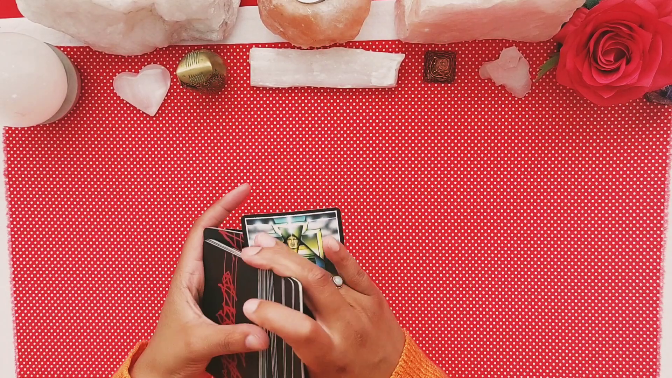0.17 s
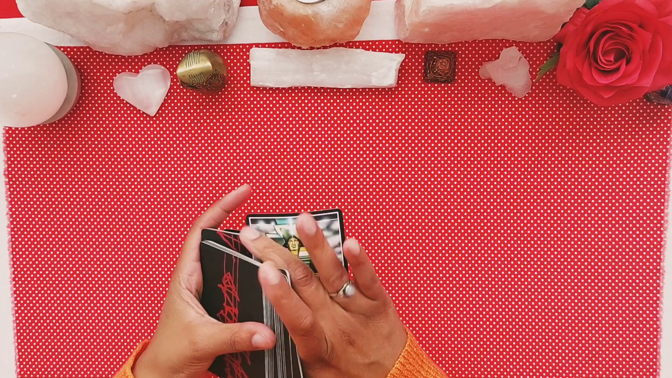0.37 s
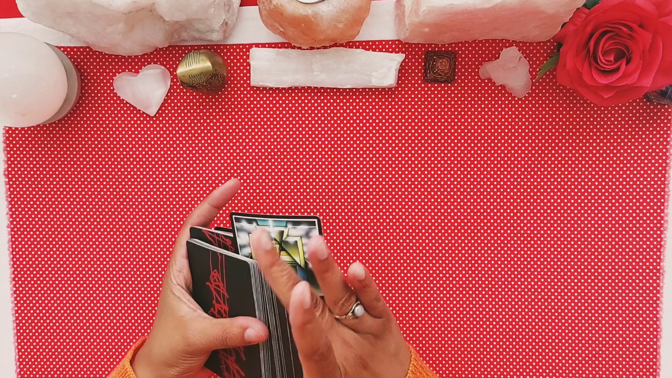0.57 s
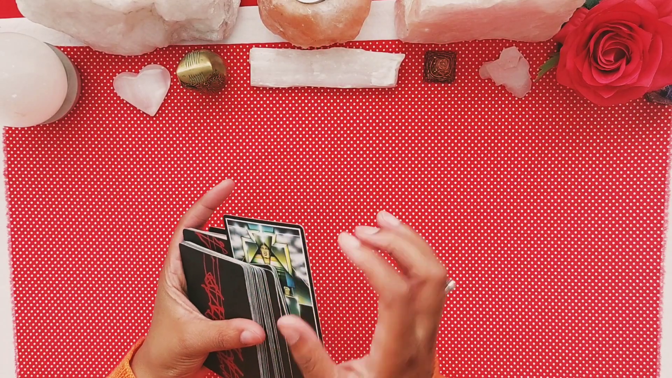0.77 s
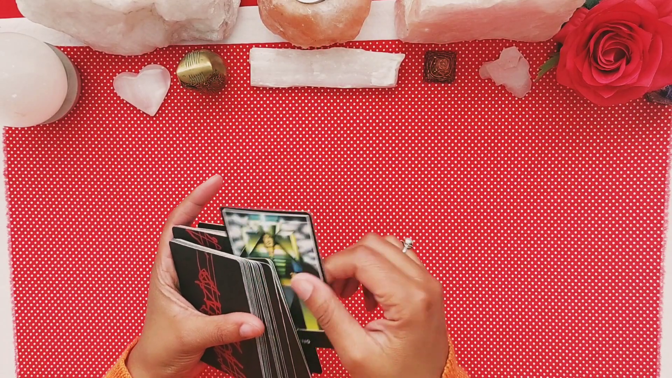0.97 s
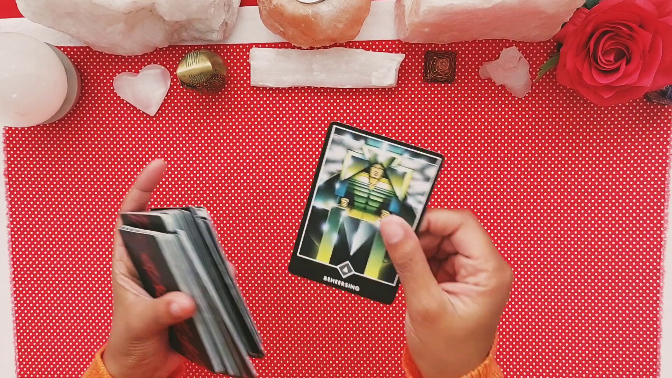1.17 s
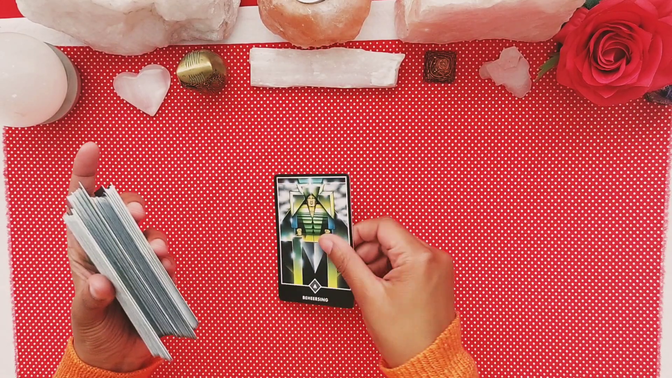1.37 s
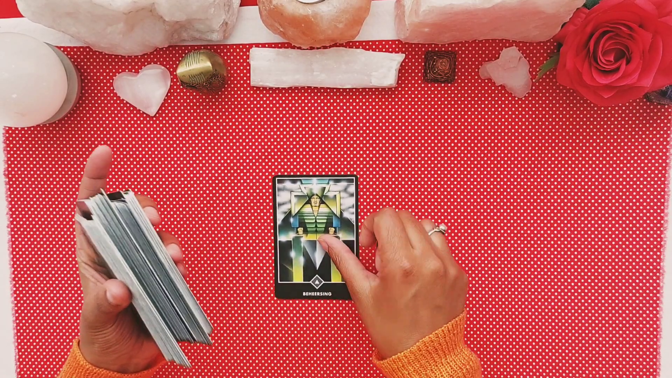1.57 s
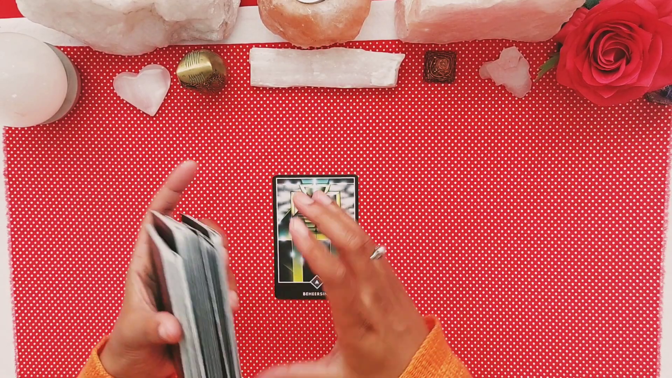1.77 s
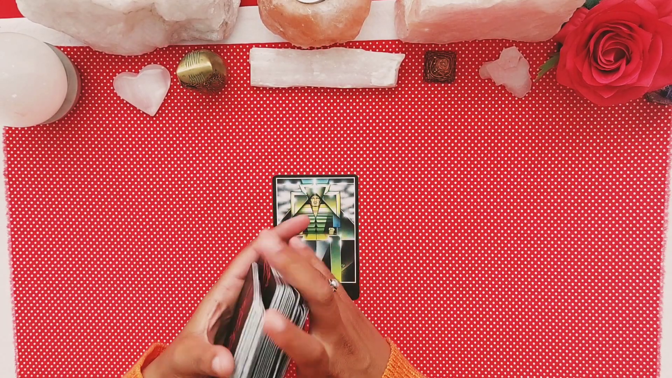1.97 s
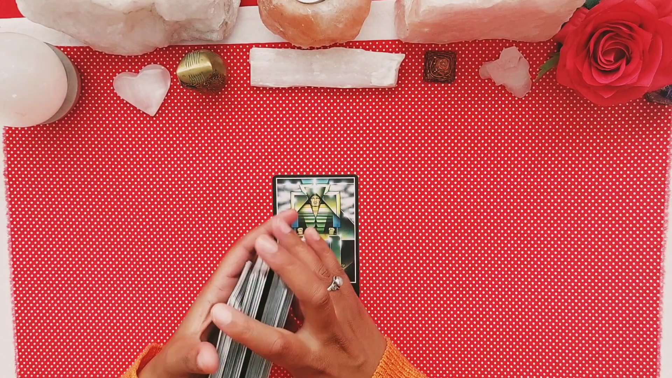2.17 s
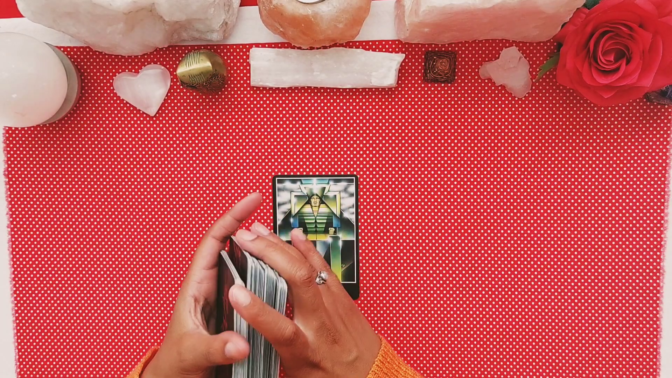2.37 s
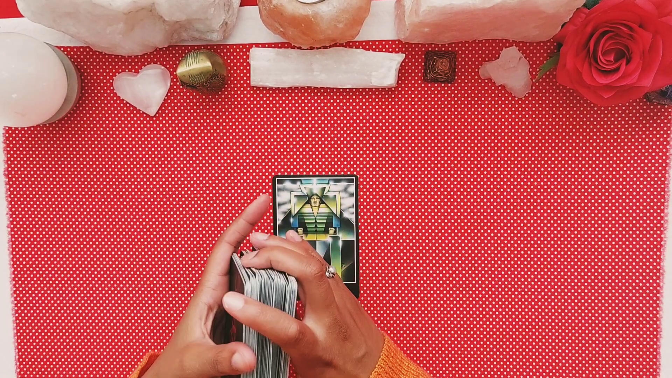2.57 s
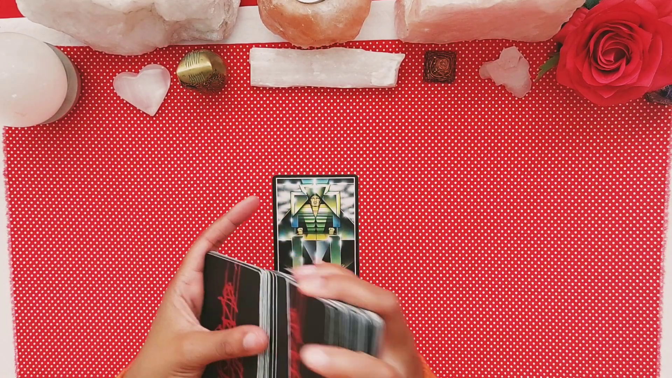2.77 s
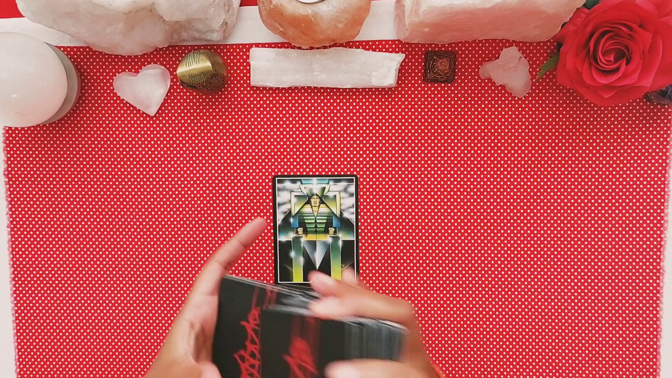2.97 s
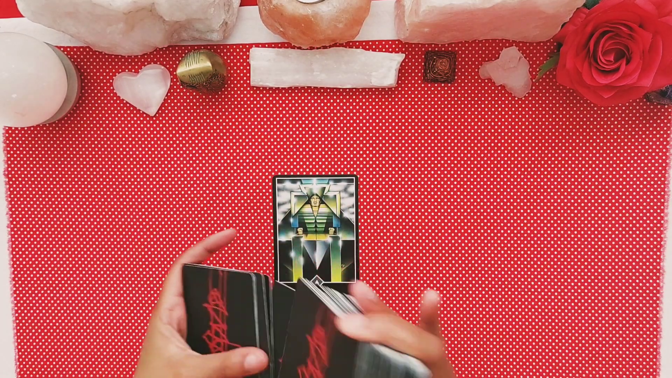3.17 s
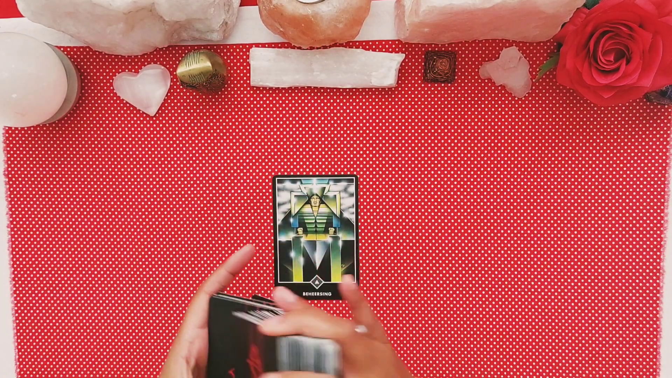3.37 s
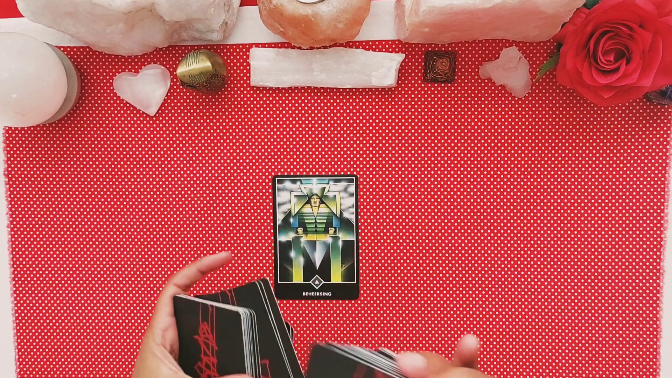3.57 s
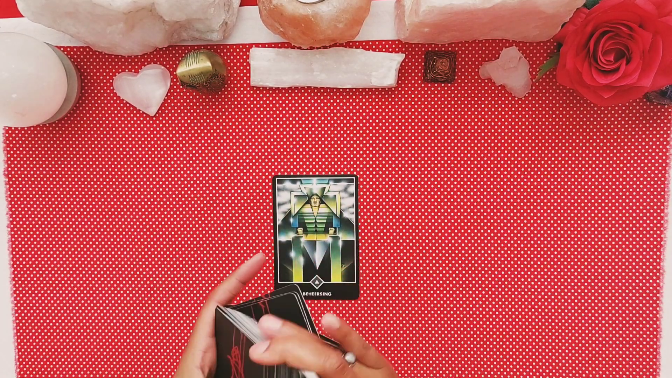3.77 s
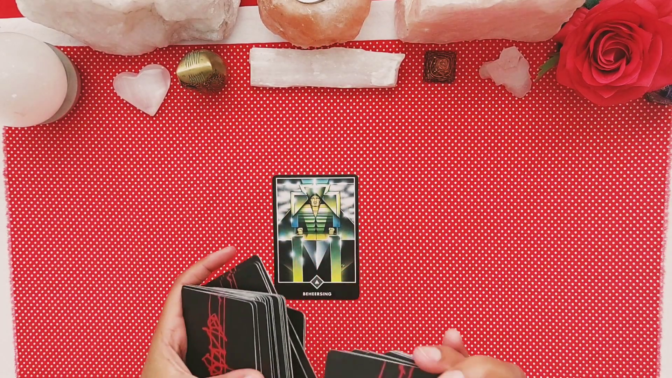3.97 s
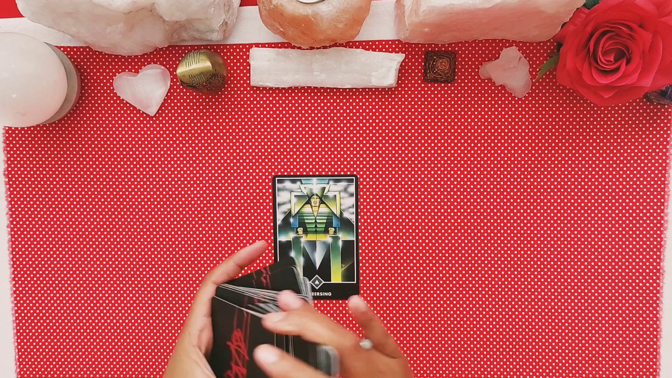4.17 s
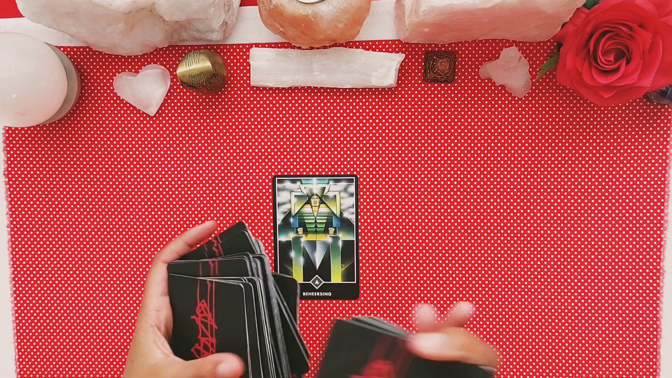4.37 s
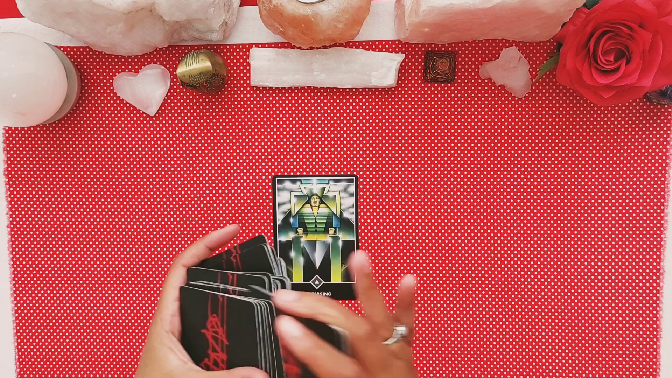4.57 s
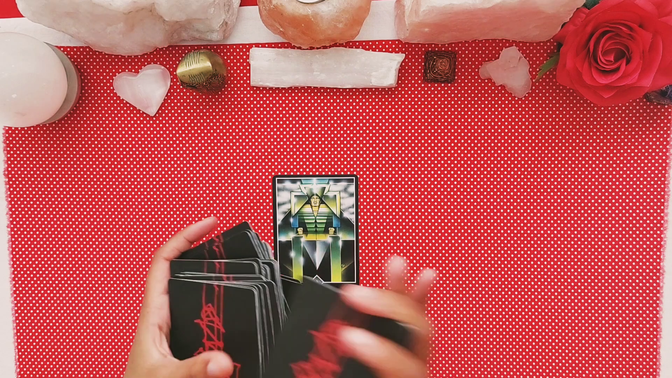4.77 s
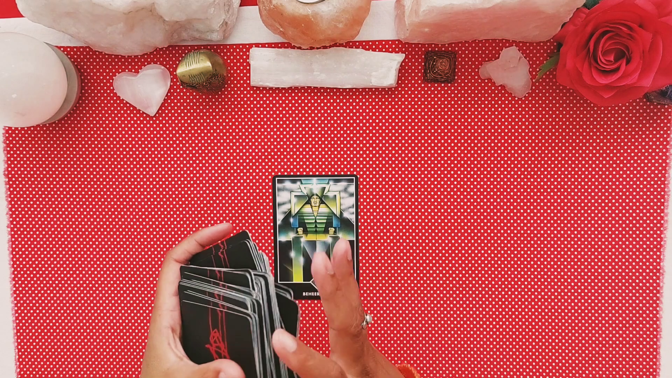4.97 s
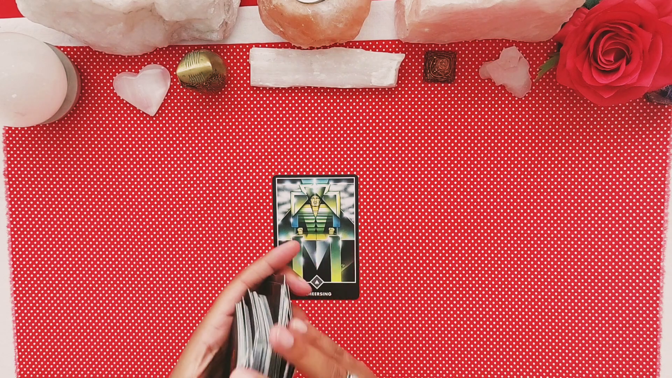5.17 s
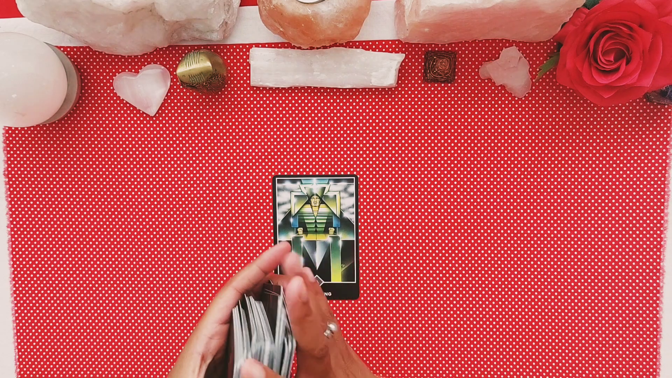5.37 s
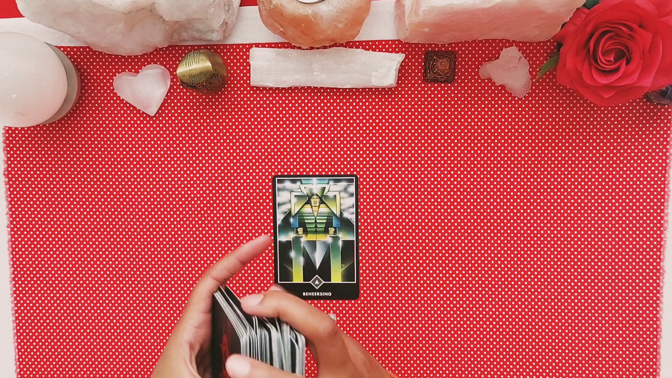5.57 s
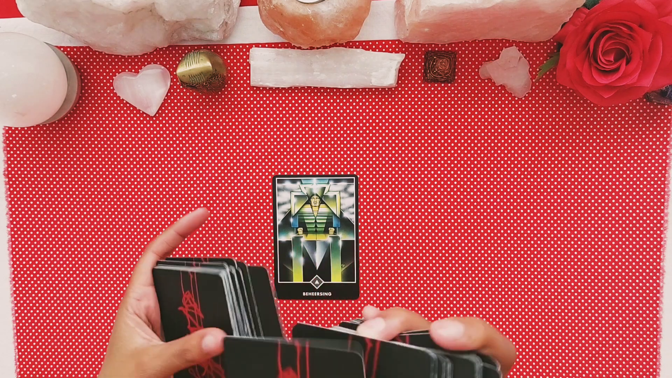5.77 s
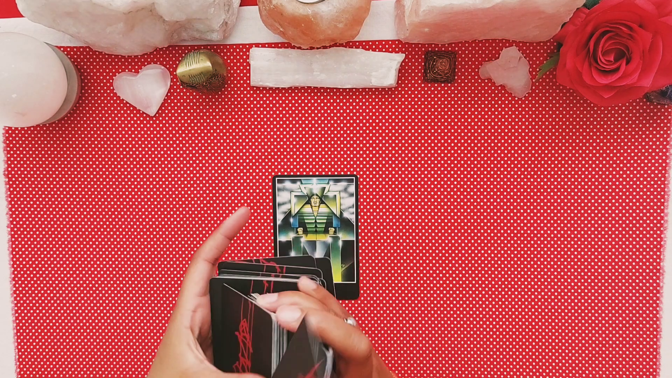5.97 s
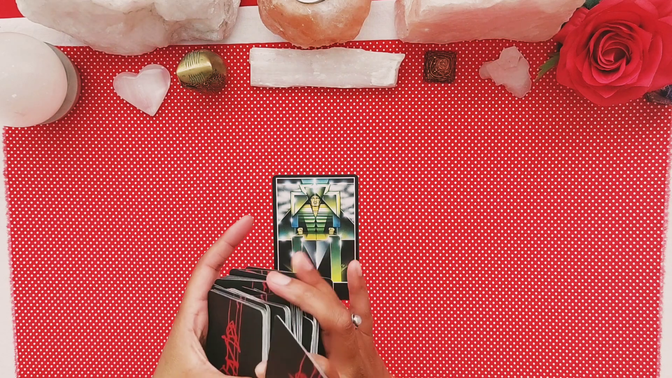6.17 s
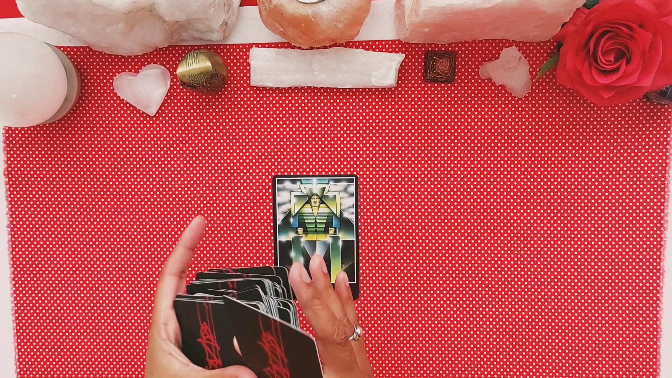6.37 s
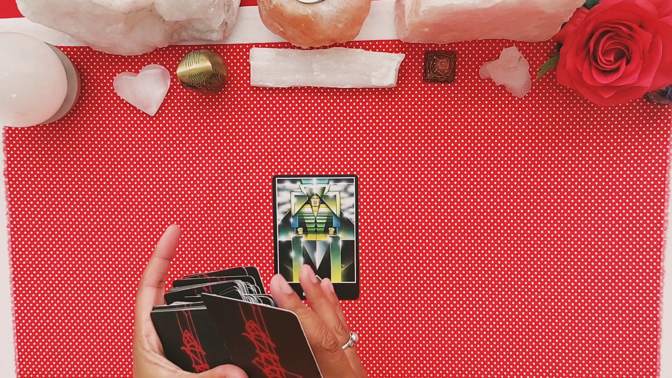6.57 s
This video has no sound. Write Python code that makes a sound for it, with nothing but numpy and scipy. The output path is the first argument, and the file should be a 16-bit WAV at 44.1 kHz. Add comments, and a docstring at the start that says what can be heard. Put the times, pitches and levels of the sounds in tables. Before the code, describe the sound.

Coated cards are shuffled in the hands, close to the microphones. A few quick slaps open, then faint rubbing as one card is eased out, snapped free and set on a cloth-covered table with a soft low thump. After quiet squaring rustles, a firm slap starts a run of brisk overhand passes, each a hissing slide and papery clap. More rustling and looser slaps follow in a small, quiet room with short reflections.

```python
"""Overhand shuffle of tarot cards

A deck is shuffled above a cloth-covered table in a small, quiet room. Packets slide over each other
with a fine hiss, made of dense filtered noise, and slap against the deck, made of short noise bursts
and a brief ring of trapped air. Early on one card is drawn, snapped free and laid down, and the table
answers with a soft thump of low decaying tones. Reflections and a faint room tone surround it all."""
import sys
import numpy as np
from scipy import signal
from scipy.fft import rfft, irfft, next_fast_len
from scipy.io import wavfile
from scipy.ndimage import uniform_filter1d

SR = 44100
rng = np.random.default_rng(int(sys.argv[2]) if len(sys.argv) > 2 else 0)


def store_pcm(level_fs):
    """Save levels as 16-bit WAV."""
    pcm = np.round(np.clip(level_fs, -1, 1) * 32767).astype(np.int16)
    wavfile.write(sys.argv[1], SR, np.atleast_2d(pcm).T)


N = 291501
TIME = np.arange(N) / SR

# overhand passes, in which a packet lands on the deck and is dragged off it; levels before trims:
# (landing [s], letting go [s], landing level [dB], edge drag level [dB], face drag level [dB])
OVERHAND_PASSES = [(0.083, 0.175, -26.5, -40.5, -48.5), (3.04, 3.217, -35, -44.5, -45.5),
                   (3.414, 3.541, -29, -41, -43.5), (3.787, 3.94, -31, -48, -51.5),
                   (4.13, 4.278, -42, -51.5, -48.5), (4.485, 4.648, -35.5, -51, -50.5),
                   (4.832, 4.936, -50.5, -53.5, -55.5), (5.95, 6.049, -36.5, -59, -59)]


def undb(db):
    """Turn decibels into gain."""
    return 10 ** (np.asarray(db) / 20)


def at(points, hz):
    """Read (frequency [Hz], value) points on a log-frequency axis."""
    frequency, value = np.transpose(points)
    return np.interp(np.log(np.maximum(hz, 1)), np.log(frequency), value)


def colour(x, points):
    """Filter a sound to the given spectrum, with unit power gain and nothing heard ahead of the input."""
    size = next_fast_len(x.shape[-1] + 4096)
    size += size % 2
    gain = undb(at(points, np.arange(size // 2 + 1) * SR / size))
    # folding the cepstrum forward in time gives the filter its least delay
    cepstrum = irfft(np.log(gain / np.sqrt(np.mean(gain ** 2))))
    cepstrum[1:size // 2] *= 2
    cepstrum[size // 2 + 1:] = 0
    response = np.exp(rfft(cepstrum))
    return irfft(rfft(x, size) * response, size)[..., :x.shape[-1]]


def pair(size, side_db):
    """Make noise at two microphones: a shared part plus an opposed part."""
    mid, side = rng.standard_normal((2, size))
    side = side * undb(side_db)
    return np.array([mid + side, mid - side]) / np.sqrt(1 + undb(side_db) ** 2)


def walk(rate):
    """Wander at random along straight lines between knots, `rate` knots a second."""
    knots = rng.standard_normal(N // 10)
    return np.interp(TIME * rate, np.arange(len(knots)), knots)


def burst(x, db):
    """Scale a short sound so that its energy equals that level held for 5 ms."""
    return x * undb(db) / np.sqrt(np.sum(x ** 2) / (len(x) * .005 * SR))


def add(out, s, x):
    """Mix a short sound in at a time in seconds."""
    i = max(int(s * SR), 0)
    out[:, i:i + x.shape[-1]] += x[:, :N - i]


def room_tone(level_db=-64, sway_db=1):
    """A faint low rumble and hiss: coloured noise whose level sways slowly."""
    # relative spectrum of the room tone: (frequency [Hz], level per Hz [dB])
    air_colour = [(25, -17), (53, 4.5), (130, 1), (250, -5.5), (450, -12.5), (1000, -17.5), (1600, -24.5),
                  (16000, -31)]
    return colour(pair(N, side_db=0), air_colour) * undb(level_db + sway_db * walk(3.4))


def room(x, wet_db=-6, early_db=-10, gap_s=0.0037, early_s=0.0026, table_s=0.0059):
    """Quick reflections from the table and the things on it, plus a diffuse tail fading band by band."""
    # how long the room takes to fade by 60 dB: (frequency [Hz], time [s])
    room_t60 = [(150, .45), (500, .35), (1500, .33), (4000, .28), (10000, .25), (16000, .21)]
    # colour of the reverberation: (frequency [Hz], level [dB])
    room_colour = [(100, 6.5), (400, 6), (1500, 3), (4000, 6), (9000, 1), (16000, -1)]
    # long waves reach both microphones alike; the part that differs: (frequency [Hz], level [dB])
    room_width = [(150, -5.5), (400, -8), (1200, -1), (4000, 0), (12000, 1.5)]
    t = np.arange(SR // 2) / SR
    hz = np.arange(len(t) // 2 + 1) * SR / len(t)
    mid, side = rfft(rng.standard_normal((2, len(t))))
    width = undb(at(room_width, hz))
    noise = (mid + np.outer([1, -1], width * side)) / np.hypot(1, width)
    noise = noise * undb(at(room_colour, hz))

    # overlapping bands an octave apart, each with its own decay
    tail = 0
    centres = 125 * 2. ** np.arange(8)
    for centre, share in zip(centres, np.eye(len(centres))):
        band = irfft(noise * at(np.c_[centres, share], hz), len(t))
        tail = tail + band * np.exp(-np.log(1000) * t / at(room_t60, centre))
    tail *= t > gap_s
    tail *= np.sqrt(2 * np.log(1000) / (at(room_t60, 1000) * SR))

    early = pair(len(t), side_db=-11.5) * np.exp(-t / early_s) * (t > table_s)
    early /= np.sqrt(np.sum(early ** 2) / 2)
    response = undb(wet_db) * tail + undb(early_db) * early
    return signal.fftconvolve(x, response, axes=1)[:, :N]


def table(rise_s=0.0033):
    """The cloth softens each touch, so only the low modes of the table ring."""
    # the hand settling the card on the table: (time [s], level [dB])
    touches = [(1.566, -32), (1.5868, -28.5)]
    # ringing tones of the table top: (frequency [Hz], level [dB], time to fade by 60 dB [s])
    table_modes = [(133.6, -7, 0.19), (186, -14, 0.074), (346, -10, 0.13), (416, -10.5, 0.1)]
    out, t = np.zeros((2, N)), np.arange(SR // 2) / SR
    ring = 0
    for hz, db, t60 in table_modes:
        ring = ring + undb(db) * np.sin(2 * np.pi * hz * t) * np.exp(-np.log(1000) * t / t60)
    soft_ring = ring * (1 - np.exp(-t / rise_s))
    for s, db in touches:
        add(out, s, undb(db) * soft_ring[None])
    return out


def chafes(width_hz=260, side_db=-7, catch_db=2.0, taper=.3):
    """A card chafing on its neighbour sings: uneven slips feed one gliding resonance of the bent card."""
    # narrow-band chafes: (start [s], end [s], start pitch [Hz], end pitch [Hz], level midway [dB],
    # swell from start to end [dB])
    card_chafes = [(0.34, 0.589, 1442, 1782, -58, 11), (1.073, 1.268, 1817, 1820, -66, -33),
                   (2.05, 2.162, 1964, 2193, -61, -10), (2.731, 2.883, 1077, 980, -54, 12),
                   (3.077, 3.12, 2240, 1830, -47, 16), (4.655, 4.827, 1970, 1888, -59, -9.5),
                   (6.038, 6.073, 1210, 1530, -44, -2), (6.059, 6.07, 3040, 2920, -45, 7),
                   (6.173, 6.328, 1602, 1570, -64, -20)]
    out = np.zeros((2, N))
    lowpass = signal.butter(2, width_hz / 2, fs=SR, output="sos")
    for start, end, hz0, hz1, db, swell_db in card_chafes:
        size = max(int((end - start) * SR), 64)
        # low complex noise, shifted up to the gliding pitch
        slips = signal.sosfilt(lowpass, pair(size, side_db) + 1j * pair(size, side_db))
        phase = 2 * np.pi * np.cumsum(np.linspace(hz0, hz1, size)) / SR
        song = np.real(slips * np.exp(1j * phase))
        level = undb(db + swell_db * np.linspace(-.5, .5, size))
        add(out, start, level * song / np.std(song) * signal.windows.tukey(size, taper))
    return out * undb(catch_db * walk(150))


def friction(points, side_db, grain_db, catch_db, tick_rate=70, tick_db=-11):
    """Dense tiny slips of uneven size, which bunch up where an edge catches; single edges tick past."""
    size = undb(grain_db * walk(2500) + catch_db * walk(130))
    slips = pair(N, side_db) * size / np.sqrt(np.mean(size ** 2))
    # tick_rate is the average number of ticks a second
    ticks = (rng.random(N) < tick_rate / SR) * rng.uniform(-1, 1, N)
    return colour(slips + undb(tick_db) * ticks / np.std(ticks), points)


def slide_drive(body_db=-8, swell_power=.9):
    """Drive of faces, edges and bodies in slow slides: each swells and fades with the hand's speed."""
    # cards drawn, cut and squared up; levels before the trims in slides():
    # (start [s], rise [s], fall [s], face hiss level [dB], edge rasp level [dB])
    slow_slides = [(0.208, 0.03, 0.05, -46, -46), (0.335, 0.048, 0.075, -51.5, -53.5),
                   (0.42, .13, 0.049, -54.5, -49.5), (0.63, 0.047, 0.021, -68, -61.5),
                   (0.89, 0.014, 0.027, -63.5, -87), (0.985, 0.029, 0.12, -51, -65),
                   (1.1, 0.056, 0.046, -62, -67), (1.42, 0.023, 0.046, -70, -68.5),
                   (1.48, .055, .025, -57, -58), (1.912, 0.024, 0.13, -66.5, -72),
                   (2.031, 0.052, 0.03, -51, -55), (2.13, 0.017, 0.19, -59, -63.5),
                   (2.33, 0.071, 0.055, -67.5, -71.5), (2.45, 0.032, 0.054, -54.5, -78),
                   (2.5, 0.028, 0.18, -65, -70.5), (2.678, 0.083, 0.1, -56, -62.5),
                   (2.83, 0.021, 0.029, -35, -58), (3.66, 0.02, 0.023, -70, -65),
                   (5.02, 0.02, .04, -64.5, -77), (5.055, 0.099, 0.049, -49, -48.5),
                   (5.2, 0.076, 0.073, -63.5, -69), (5.32, 0.041, 0.062, -62.5, -64.5),
                   (5.42, 0.031, 0.15, -63, -68.5), (5.49, 0.091, .06, -56.5, -61.5),
                   (5.6, 0.14, 0.12, -48, -62), (6.04, 0.024, 0.028, -47, -47.5),
                   (6.11, 0.034, 0.061, -45, -53.5), (6.199, 0.074, 0.12, -65, -63),
                   (6.38, 0.018, 0.09, -70, -63)]
    drive = np.zeros((3, N))
    for start, rise, fall, hiss_db, edge_db in slow_slides:
        speed = np.sin(np.pi / 2 * np.interp(TIME - start, [0, rise, rise + fall], [0, 1, 0]))
        # the card bodies follow the edges that drive them
        levels = undb([hiss_db, edge_db, edge_db + body_db])
        # a higher power narrows the swell
        drive += np.outer(levels, speed ** swell_power)
    return drive


def pass_drive(rise_s=0.0063, release_s=0.0098):
    """Drive of faces, edges and bodies in passes: faint lift, short skid, then drag until the release."""
    # the fingers rustle as they lift the next packet; lift and skid levels are against the landing
    lift_lead_s, lift_spread_s, lift_db = .055, 0.048, -29.5
    skid_db, skid_s = -1.5, 0.031
    # the drag speeds up towards the release, so the faces hiss more while the edges rasp evenly
    drag_growth_db = 2
    face_trim_db, edge_trim_db, body_trim_db = -3, -6, -3
    drive = np.zeros((3, N))
    for lands, lets_go, landing_db, edge_db, face_db in OVERHAND_PASSES:
        age = np.maximum(TIME - lands, 0)
        release = np.exp(-np.maximum(TIME - lets_go, 0) / release_s)
        contact = (1 - np.exp(-age / rise_s)) * release
        progress = np.minimum(age / (lets_go - lands), 1)
        lift_shape = np.exp(-((TIME - lands + lift_lead_s) / lift_spread_s) ** 2)
        lift = undb(landing_db + lift_db) * lift_shape
        skid = undb(landing_db + skid_db) * np.exp(-age / skid_s)
        face_drag = undb(face_db + drag_growth_db * (progress + 1.5))
        faces = lift + contact * np.hypot(skid, face_drag)
        edges = lift + contact * np.hypot(skid, undb(edge_db))
        drive += [faces * undb(face_trim_db), edges * undb(edge_trim_db), edges * undb(body_trim_db)]
    return drive


def slides(hiss_db=-0.5, rasp_db=-3.5, body_db=-3):
    """Every stroke makes the coated faces hiss, the edges rasp and the card bodies sound."""
    # colours of faces, edges and card bodies, each: (frequency [Hz], level [dB])
    hiss_colour = [(2500, -19.5), (5500, -14), (8000, -11), (10000, -3.5), (12000, -1), (14000, -4),
                   (16000, -9.5)]
    rasp_colour = [(1200, -23), (2400, -6.5), (3500, -8), (5000, -6), (6500, -13), (10000, -27.5)]
    body_colour = [(80, -14), (200, -6.5), (350, -10), (700, -3), (1200, -3.5), (1700, 2.5), (2200, -3),
                   (3000, -11.5), (6000, -21)]
    drive = pass_drive() + slide_drive()
    hiss = friction(hiss_colour, side_db=0.5, grain_db=1.5, catch_db=2.5) * undb(hiss_db)
    rasp = friction(rasp_colour, side_db=-3.0, grain_db=4, catch_db=2) * undb(rasp_db)
    body = friction(body_colour, side_db=-5.0, grain_db=4, catch_db=2.5) * undb(body_db)
    return drive[0] * hiss + drive[1] * rasp + drive[2] * body


def clatter(t, length_ms, side_db, first, lead_s):
    """The cards brush, meet sharply at t = 0, then the rest of the packet closes up behind."""
    length_ms = max(length_ms, .2)
    shape = np.exp(-np.maximum(t * 1000 / length_ms, -t / lead_s))
    force = pair(len(t), side_db) * shape / np.sqrt(np.sum(shape ** 2))
    force[:, np.searchsorted(t, 0)] += first / np.sqrt(length_ms)
    # hard contacts drive all broad bands alike; only the fine comb of the clatter is left to chance
    lines = rfft(force)
    broad_power = uniform_filter1d(np.mean(np.abs(lines) ** 2, axis=0), size=48)
    return irfft(lines / np.sqrt(broad_power), len(t))


def blows():
    """List the slaps, and the soft pat, always of the same kind, with which each pass begins."""
    # packets and single cards slapping home; levels and lengths before the trims in slaps():
    # (time [s], clap level [dB], hardness [dB], cavity pitch [Hz], cavity level [dB], clatter length [ms])
    card_slaps = [(0.011, -42, 2, 1060, -59, 2.4), (0.0498, -32.5, 0.5, 1700, -34, 7.7),
                  (0.0704, -26.5, -0.5, 1380, -27.5, 12), (0.171, -38, 0, 1210, -40.5, 4.2),
                  (0.228, -39, 3, 1520, -40, 10), (0.938, -58, 12, 1070, -65, 13),
                  (1.0791, -33.5, -2, 824, -34.5, 2.7), (1.5395, -33.5, -0.5, 2760, -33, 1.6),
                  (1.564, -26.5, -2, 1320, -37, 1.3), (2.874, -25, -10, 655, -17.5, 4.7),
                  (2.878, -18.5, 3, 1084, -21.5, 2.14), (3.062, -27.5, 1.5, 1900, -35, 3.3),
                  (3.0722, -29.5, 6.5, 1650, -23, 5.1), (3.075, -30, 3.5, 2500, -22.5, 3),
                  (3.114, -34, -2.5, 1440, -32.5, 6.2), (3.1911, -27.5, 1, 1900, -31.5, 4.8),
                  (3.2, -17.5, 7.5, 7820, -16.5, .9), (3.5666, -26.5, 3, 2590, -27, 1.8),
                  (3.8925, -38, 4, 4000, -40.5, 3.5), (3.9318, -29.5, 4.5, 3000, -44, 1.6),
                  (4.153, -52, -0.5, 1520, -42.5, 3), (4.263, -44, 7.5, 1500, -50, 6.3),
                  (4.2864, -27, 4.5, 715, -31.5, 0.7), (4.6657, -26.5, 0.5, 1582, -22.5, 0.7),
                  (5.542, -51, 7.5, 1800, -56, 4.7), (5.767, -23.5, -2, 2040, -34.5, 8),
                  (5.7779, -23.5, 1, 262, -35.5, 10), (5.935, -42, 3.5, 1200, -55, 4),
                  (5.972, -39, -4, 790, -43, 11), (6.044, -38, 1.5, 1190, -38, 54),
                  (6.186, -51.5, 4.5, 1600, -50, 3)]
    # the cavity level of a pat is against its clap
    hardness_db, cavity_hz, cavity_db, length_ms = -2.5, 1330, -8, 4.5
    pats = [(lands, db, hardness_db, cavity_hz, db + cavity_db, length_ms)
            for lands, _, db, _, _ in OVERHAND_PASSES]
    return card_slaps + pats


def slaps(ring_cycles=0.96, clap_db=-2, cavity_db=-2, cavity_room_db=-3,
          thud_stretch=1.4, snap_stretch=1.0, lead_s=0.0017):
    """Each blow claps, thuds into the hand, snaps at the edge and briefly rings the gap between cards."""
    # colours of the contacts, each: (frequency [Hz], level [dB])
    clap_colour = [(150, -27), (450, -13), (750, 6), (1100, 4), (2000, 3), (2800, -2), (4500, -3.5),
                   (8000, -30)]
    thud_colour = [(40, -21.5), (110, -6.5), (190, -11), (300, -1.5), (560, 2.5), (900, -14), (2000, -34.5)]
    snap_colour = [(1200, -34), (3000, -9), (4800, 3), (6500, -3), (8500, -3.5), (11500, 3.5),
                   (14000, -0.5), (16000, 0.5)]
    # a hard blow trades thud for edge snap; levels against the clap before its trim
    thud_db, snap_db = -9.5, -4.5
    # sound aimed at the microphones, and the smoother average over all directions that fills the room
    near, spread = np.zeros((2, N)), np.zeros((1, N))
    t = np.arange(-128, 1920) / SR
    after, impulse = np.maximum(t, 0), (t == 0)[None] * 1.
    for s, clap, hardness, hz, cavity, length in blows():
        clap_force = clatter(t, length, side_db=-7, first=0.41, lead_s=lead_s)
        thud_force = clatter(t, length * thud_stretch, side_db=-14, first=0.42, lead_s=lead_s)
        snap_force = clatter(t, length * snap_stretch, side_db=0.5, first=0, lead_s=lead_s / 2)
        parts = [(clap_colour, clap + clap_db, clap_force),
                 (thud_colour, clap + thud_db - hardness, thud_force),
                 (snap_colour, clap + snap_db + hardness, snap_force)]
        for points, db, force in parts:
            add(near, s + t[0], burst(colour(force, points), db))
            add(spread, s + t[0], burst(colour(impulse, points), db))
        # the air trapped between the cards rings for a few cycles, damped by the hands
        swell = after * np.exp(-after * hz / ring_cycles)
        ring = np.gradient(np.sin(2 * np.pi * hz * after) * swell)
        add(near, s + t[0], burst(ring[None], cavity + cavity_db))
        add(spread, s + t[0], burst(ring[None], cavity + cavity_db + cavity_room_db))
    return near, spread


def scene(table_room_db=-8):
    """Cards and table heard directly, their sound in the room, and the room tone."""
    near, spread = slaps()
    rubbing = slides() + chafes()
    thump = table()
    reverberation = room(spread + rubbing + undb(table_room_db) * thump)
    return near + rubbing + thump + reverberation + room_tone()


def record(dry, top_hz=16000):
    """Two slightly unlike microphones; the recorder clips at full scale and cuts the top."""
    # difference in colour of the microphones: (frequency [Hz], left minus right level [dB])
    balance = [(60, 10.5), (300, 3), (1200, -0.5), (4500, 1.5), (9000, -2.5)]
    lean = at(balance, np.arange(N // 2 + 1) * SR / N) / 2
    heard = irfft(rfft(dry) * undb([lean, -lean]), N)
    lowpass = signal.ellip(10, .2, 70, top_hz, fs=SR, output="sos")
    return signal.sosfilt(lowpass, np.clip(heard, -1, 1))


dry = scene()
out = record(dry)
store_pcm(out)
```